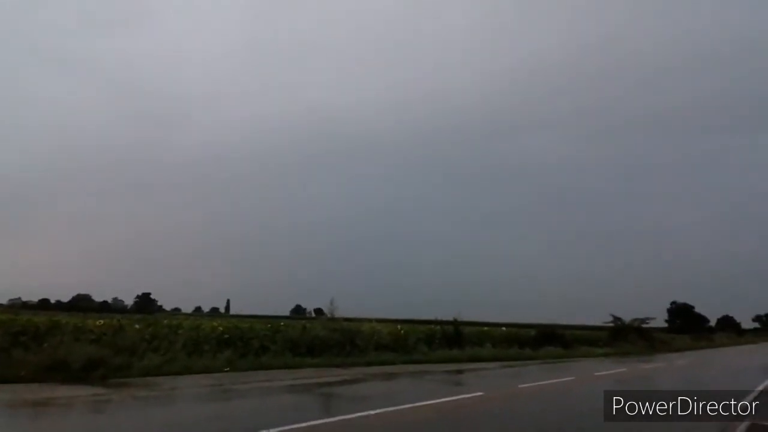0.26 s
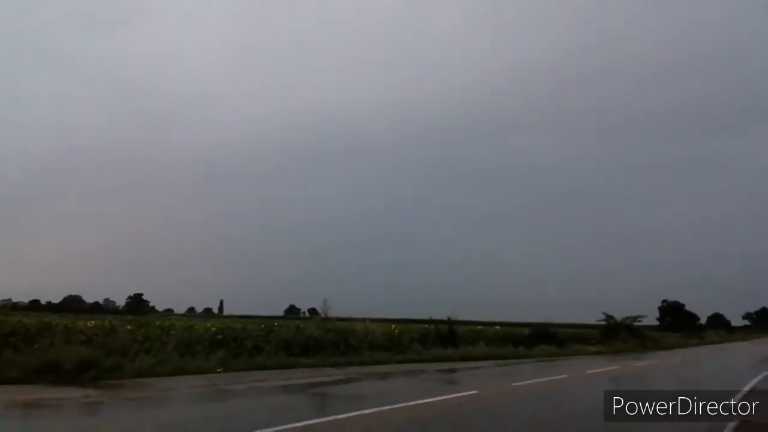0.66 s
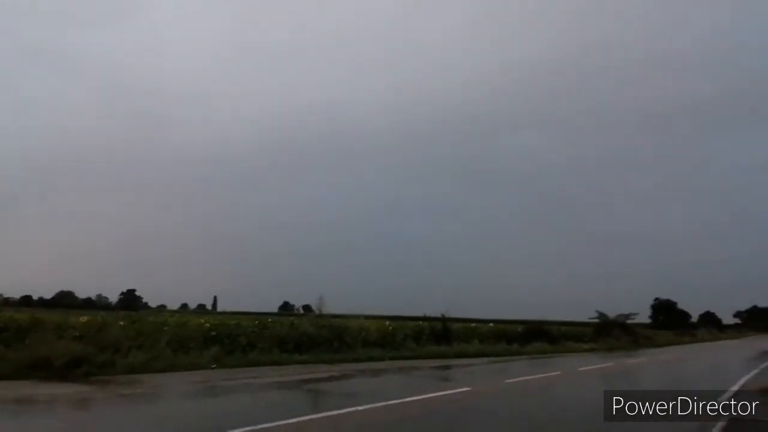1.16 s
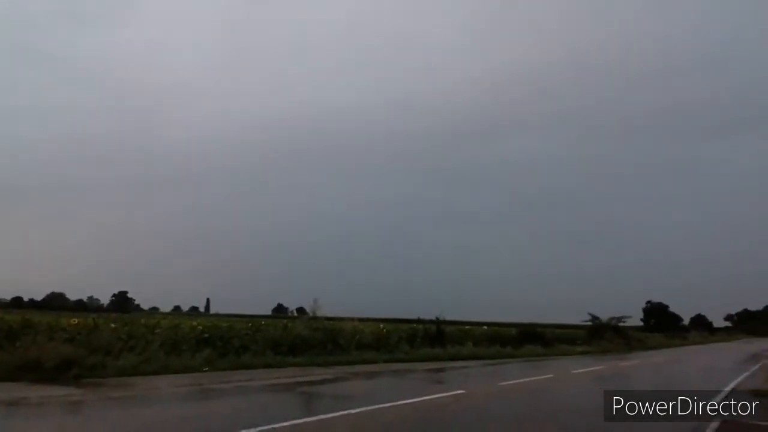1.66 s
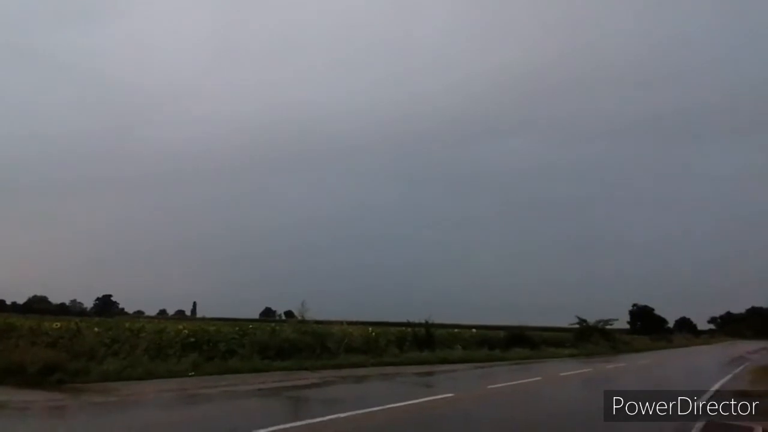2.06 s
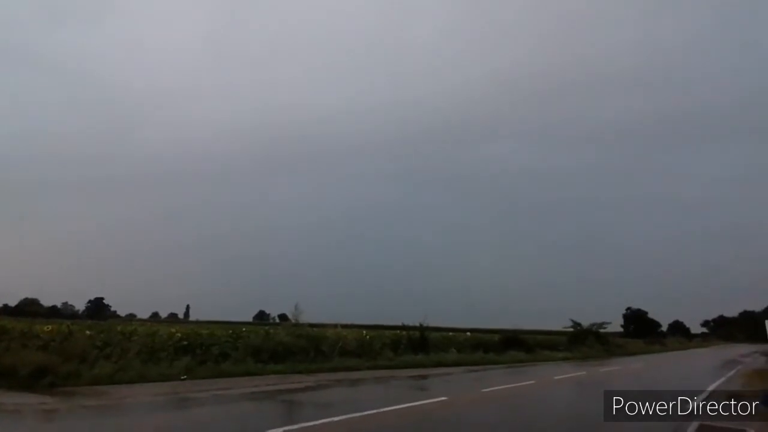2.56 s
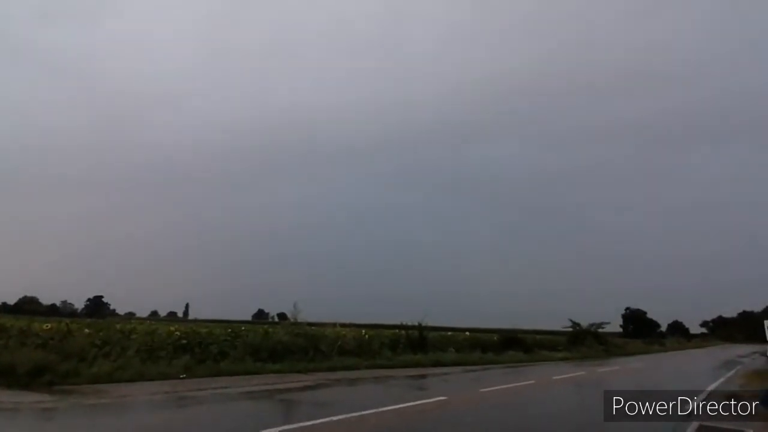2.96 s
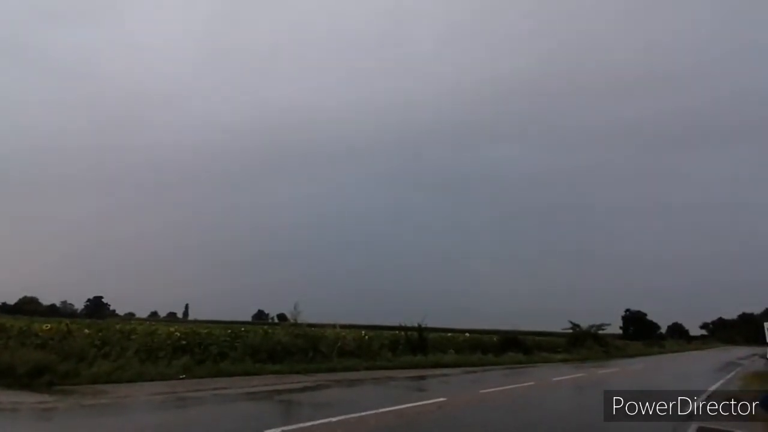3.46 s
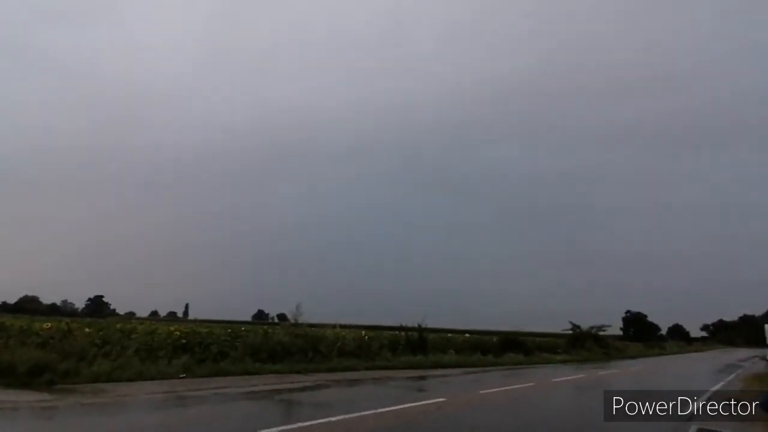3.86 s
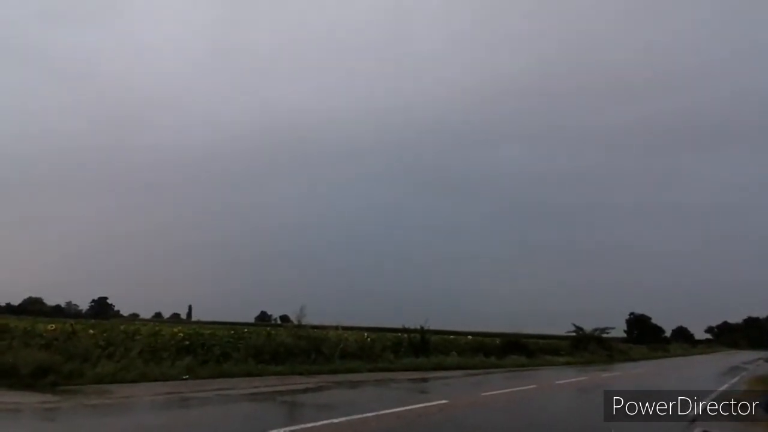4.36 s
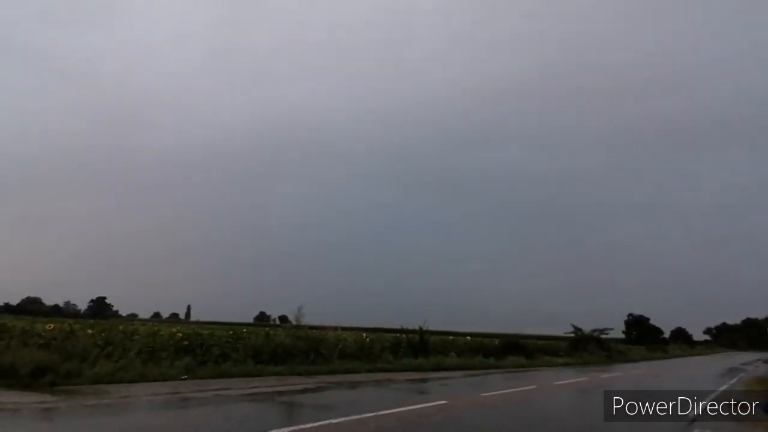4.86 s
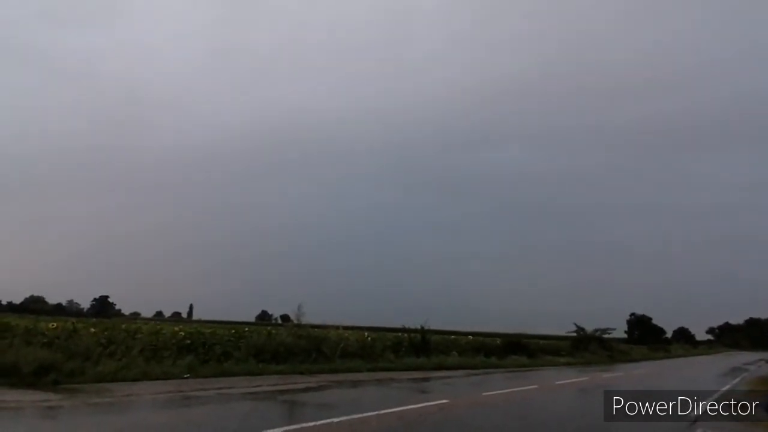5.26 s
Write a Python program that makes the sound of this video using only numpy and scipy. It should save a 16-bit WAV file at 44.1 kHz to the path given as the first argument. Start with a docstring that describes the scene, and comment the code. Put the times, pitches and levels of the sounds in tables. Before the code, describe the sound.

A low roll of thunder is sounding from the start, over open fields beside a wet road, with a small boom at 0.5 seconds. At about 1 second it swells suddenly into loud, deep booms and cracks, the sharpest near 1.2 seconds and another near 1.7. The loudest moments overload the small stereo microphone with a brief rasp. After a short dip, a second surge cracks at about 2.3 seconds and booms on until 3. The thunder then grows duller and weaker, with small swells near 3.3 and 3.8 seconds, drifting leftward. From about 4 seconds to the end at 5.5, faint hums and soft bumps sound on the left over the remaining rumble. Throughout, light rain makes a soft, fine hiss and patter, while single drops tick irregularly on a surface close to the microphone, mostly on the right.

```python
"""Thunder rolls over open fields beside a wet road, swells in several bursts and dies away.
Countless small shock waves from the long lightning channel blur into a rumble, and the strongest
stand out as booms and cracks. Light rain hisses on the road, and single drops tick on a surface
close to a small stereo microphone, mostly on its right. The loudest thunder overloads the
microphone, adding a brief rasp of distortion. Near the end come faint hums and bumps on the left."""
import sys
import numpy as np
from scipy import signal
from scipy.fft import rfft, irfft
from scipy.io import wavfile
from scipy.ndimage import uniform_filter1d

SR = 44100
rng = np.random.default_rng(int(sys.argv[2]) if len(sys.argv) > 2 else 0)


def wav_record(signal):
    """Record a signal, one row per channel, as 16-bit PCM in the file named by sys.argv[1]."""
    frames = np.transpose(np.atleast_2d(signal))
    bounded = np.clip(frames, -1, 1)
    # unit amplitude maps onto the largest positive 16-bit level
    quanta = np.round(bounded * 32767).astype(np.int16)
    wavfile.write(sys.argv[1], SR, quanta)


N = 242971

# The steady roll of thunder: (time [s], rumble [dB], rumble pitch [Hz], thuds [dB], roar [dB])
STEADY_ROLL = [(0, -35, 162.7, -36, -32), (.28, -33.5, 160, -30, -34), (0.499, -33, 153.2, -35, -39),
               (0.802, -36.5, 170, -54.5, -32.5), (.96, -34, 176.4, -44.5, -34.5),
               (1.358, -43, 150, -41, -36.5), (1.68, -37, 243.4, -34.5, -42), (1.9, -35, 143, -40.5, -45.5),
               (2.5, -33.5, 193.5, -40, -44), (3.13, -38, 186, -49, -49.5), (3.6, -43, 193, -48, -51),
               (4.05, -42.5, 227.6, -46, -49.5), (4.451, -39.5, 232, -52, -48),
               (4.899, -49.5, 157, -44, -55), (5.51, -48, 198.5, -55, -51)]
# Bursts, as a near bend of the lightning is heard:
# (time at full level [s], hold [s], rumble [dB], thuds [dB], roar [dB])
BURSTS = [(1.026, 0.1, -22, -25, -36), (1.205, 0.086, -21, -24, -32), (1.408, 0.056, -29, -27, -47.5),
          (1.624, 0.11, -25.5, -30.5, -34), (2.171, 0.018, -40, -29, -42.5),
          (2.275, 0.032, -21, -28.5, -31), (2.345, 0.03, -26, -25.5, -39.5), (2.579, 0.24, -32, -31.5, -46),
          (2.788, 0.24, -29.5, -36, -53), (3.247, 0.13, -29, -67, -46.5), (3.796, 0.046, -35.5, -46.5, -63)]
# Tone of the deep thuds: (frequency [Hz], level [dB])
THUD_TONE = [(12, -40), (28, -13.5), (45, 14), (75, 9), (120, 16.5), (180, -66.5)]
# Tone of the roar: (frequency [Hz], level [dB])
ROAR_TONE = [(200, -15), (330, -2.5), (600, -2.5), (1050, -12.5), (1500, -29), (2100, -42), (3000, -62)]
# Tone of the roar's bright top: (frequency [Hz], level [dB])
BRIGHT_TONE = [(700, -35), (1400, -14.5), (2100, -30.5), (3000, -48)]
# The low roll wanders from side to side: (time [s], left over right [dB])
ROLL_PAN = [(0, 3.5), (.8, 3.5), (1.1, -2.5), (1.7, 0.5), (3, 1), (4.4, 5.5), (5.2, 8), (5.51, 2.5)]
# The low sound reaches the right side first; near the end, the left: (time [s], left delay [samples])
LEFT_DELAY = [(4.3, 8), (4.7, -9)]
# Single booms, then faint hums and bumps on the left near the end:
# (time [s], level [dB], pitch [Hz], length [ms], left over right [dB])
BOOMS_AND_HUMS = [(.504, -19, 149, 7.3, -7), (.94, -29.5, 753, 6.8, -21.5), (1.034, -11, 117, 7.6, -2),
                  (1.049, -16, 132.5, 15, -3.5), (1.098, -8.5, 157, 14, -6), (1.16, -10, 161, 35, -6),
                  (1.244, -10.5, 340, 1.4, -10.5), (1.286, -12.5, 224, 7.1, -3),
                  (1.416, -18.5, 314, 4.6, -1), (1.425, -11.5, 98, 9.4, -2), (1.467, -19, 132, 10, -2),
                  (1.691, -13.5, 201, 3.2, -10.5), (2.2, -17.5, 270, 10, 2), (2.286, -15, 212, 14.5, -2.5),
                  (2.351, -32, 233, 9.3, 7.5), (2.585, -18, 109, 11, -3), (2.649, -10.5, 226, 7.6, -1),
                  (2.712, -19.5, 190, 21, -0.5), (3.002, -22.5, 70, 9.7, 20), (3.368, -26.5, 196, 7.6, -2),
                  (3.679, -29, 170, 20, 7.5), (3.836, -26.5, 284, 14, 3), (4.012, -27, 74, 23, 9),
                  (4.276, -29.5, 239.3, 63, 5.5), (4.5, -31, 175, 19, -3), (4.79, -34, 273, 18, 15.5),
                  (4.995, -32, 161.5, 12, 8), (5.015, -51.5, 648, 27, 18), (5.122, -55.5, 390, 200, 16),
                  (5.283, -32, 303, 18, 13), (5.362, -41, 445, 29, 5)]
# Sharp cracks within the bursts: (time [s], level [dB])
CRACK_HITS = [(1.032, -37.5), (1.242, -21.5), (1.285, -33.5), (1.414, -36), (1.627, -37), (1.689, -29.5),
              (2.27, -36.5), (2.289, -35), (2.354, -34.5)]
# Close raindrops: (time [s], level [dB], sharpness [0-1], left over right [dB])
CLOSE_DROPS = [(0.08, -42.5, 0, -11), (.2533, -56, 0.4, -5), (0.411, -46, 0.7, -4), (0.447, -40, 0.75, -5),
               (0.498, -35.5, 0.68, -8), (0.6749, -50, 1, 10), (0.833, -42, 0.3, -7),
               (0.9044, -45.5, 0.7, -7), (1.052, -41, 0.5, 5), (1.13, -44, 0.77, -8.5),
               (1.278, -49, 0.4, -11), (1.4843, -51.5, 1, -1), (1.6313, -51, 0.3, -14),
               (1.7556, -47.5, 0.05, -9), (1.8377, -48, .6, -3), (1.991, -44, 0.9, -4),
               (2.2644, -41.5, 0.95, -6), (2.4117, -45.5, 0.4, -4), (2.6217, -38, 0.2, -5.5),
               (2.649, -49.5, 0, -6), (3.558, -46, 0.7, -15), (3.9619, -55, 0.4, -2), (4.08, -43, 0.55, -1),
               (4.189, -51, 1, 4), (4.255, -42.5, 0.86, -3), (4.492, -41.5, 0.64, -3), (4.6513, -50, 1, 1),
               (4.701, -42.5, 0.4, -4), (5.125, -39.5, 1, -5), (5.2822, -46, 0.3, -9),
               (5.3213, -50, 0.6, 20), (5.3824, -45, 0.7, 8)]
# The patter comes in waves: (time [s], level [dB])
PATTER_LEVEL = [(0, -69), (0.999, -72), (3.001, -78.5), (5.51, -75.5)]
# Tone of the close drops and the patter: (frequency [Hz], level [dB])
DROP_TONE = [(1500, -3.5), (2800, -7), (5000, -11.5), (6500, -13), (10500, -19), (12500, -30),
             (16000, -50.5)]
# Tone of the far rain: (frequency [Hz], level [dB])
HISS_TONE = [(1000, -9.5), (1900, 1), (3400, -10), (5250, -12), (8400, -19.5), (10900, -19.5), (12500, -26),
             (15600, -39.5)]

RISE_DB_PER_S, FALL_DB_PER_S = 500, 158.5  # how fast a burst comes and goes
RING_HZ, RING_S, SPLASH_S = 5300, 0.00051, 0.0017  # a struck surface rings for only a few cycles
PATTER_PER_S, HISS_DB = 150, -66
TREBLE_LIMIT_HZ = 15700


def thunder_roll():
    """Shock waves from many bends of the lightning blur into thuds, a rumble and a brighter roar."""
    t = np.arange(N) / SR
    (rumble_gain, thud_gain, roar_gain), hz = thunder_swells(t)
    thuds = unit_level(shape_tone(clicks(per_s=500, spread_db=2.0, shared=0.83), THUD_TONE))
    rumble = resonate(clicks(per_s=1400, spread_db=2.0, shared=0.95), hz, width_hz=105)
    rumble = unit_level(resonate(rumble, hz, width_hz=150))
    shocks = clicks(per_s=5000, spread_db=1.5, shared=0.78) * waver(rate_hz=23.0, depth_db=1.03)
    shocks = mingling_echoes(shocks, depth_db=2.5)
    bright_gain = gain_of(-17 - 8.9 * t)  # later sound comes from further away, so air dulls it more
    roar = unit_level(shape_tone(shocks, ROAR_TONE))
    roar += bright_gain * unit_level(shape_tone(shocks, BRIGHT_TONE))
    low = rumble_gain * rumble + thud_gain * thuds
    return pan(follow(ROLL_PAN, t)) * low + roar_gain * roar


def thunder_swells(t):
    """Bursts rise, hold and fall over the steady roll; gives three gains and the rumble's pitch."""
    times, *columns = np.transpose(STEADY_ROLL)
    rumble_db, hz, thud_db, roar_db = (np.interp(t, times, column) for column in columns)
    power = gain_of([rumble_db, thud_db, roar_db]) ** 2
    for full_s, hold_s, *top_db in BURSTS:
        rise_db = -RISE_DB_PER_S * np.maximum(full_s - t, 0)
        fall_db = -FALL_DB_PER_S * np.maximum(t - full_s - hold_s, 0)
        power += np.outer(gain_of(top_db) ** 2, gain_of(rise_db + fall_db) ** 2)
    return np.sqrt(power), hz


def mingling_echoes(x, depth_db):
    """Each range of pitch swells and sinks on its own, as echoes from field and cloud overlap."""
    bands = signal.stft(x, nperseg=1024)[2]
    patches = uniform_filter1d(rng.standard_normal(bands.shape[1:]), size=3, axis=0)  # blur in pitch
    patches = uniform_filter1d(patches, size=4, axis=1)  # blur in time
    return signal.istft(bands * gain_of(depth_db * unit_level(patches)), nperseg=1024)[1][:, :N]


def booms_and_hums():
    """Each boom, hum or bump is a short tone that swells and fades."""
    out = np.zeros((2, N))
    t = np.arange(-6615, 6615) / SR
    for time_s, db, hz, length_ms, pan_db in BOOMS_AND_HUMS:
        phase = 2 * np.pi * hz * t
        wave = -np.cos(phase + 0.089 * np.cos(phase))  # the wave leans forward, adding overtones
        swell = np.exp(-np.log(16) * (1000 * t / length_ms) ** 2)
        add(out, time_s + t[0], gain_of(db) * pan(pan_db)[:, None] * wave * swell)
    return out


def thunder_cracks():
    """Each crack is one shock wave, a push then a pull, followed by quick echoes."""
    out = np.zeros((2, N))
    t = np.arange(900) / SR
    age = t / 0.00095
    air = signal.butter(4, 1900, fs=SR, output="sos")  # air softens the wave's front
    shock = signal.sosfilt(air, (1 - age) * np.exp(-age))
    for time_s, db in CRACK_HITS:
        echoes = rng.standard_normal((2, len(t))) * (rng.random((2, len(t))) < .04) * np.exp(-t / 0.009)
        echoes[:, 0] = 3  # the direct sound
        add(out, time_s, gain_of(db) * signal.fftconvolve(echoes, [shock / shock.max()], axes=1))
    return out


def raindrop(hz, ring_gain, sharpness):
    """A drop splashes and the surface rings briefly; sharp drops splash more and ring less."""
    t = np.arange(1500) / SR
    noise = rng.standard_normal((2, len(t)))
    spray = signal.lfilter([1, 0.8 - 1.7 * sharpness], 1, noise)
    splash = t / SPLASH_S * np.exp(1 - t / SPLASH_S) * spray
    ring = t / RING_S * np.exp(1 - t / RING_S) * np.sin(2 * np.pi * hz * t)
    # droplets fall back and keep the surface stirring
    droplets = 0.24 * np.exp(-t / 0.023) * resonate(noise, np.full_like(t, hz), width_hz=1600)
    return (1 - sharpness) * ring_gain * ring + (0.32 + sharpness) * splash + droplets


def rain():
    """Far drops blur into a fine hiss, nearer ones patter and the closest tick one by one."""
    far = clicks(per_s=18000, spread_db=1.3, shared=0.0081) * waver(rate_hz=15.0, depth_db=1.27)
    hiss = gain_of(HISS_DB) * unit_level(shape_tone(far, HISS_TONE))
    patter, close = np.zeros((2, 2, N))
    for hz in np.geomspace(3600, 8000, num=5):
        hits = clicks(PATTER_PER_S / 5, spread_db=2.5, shared=0.41)
        drop = raindrop(hz, ring_gain=0.65, sharpness=rng.random())
        patter += signal.oaconvolve(hits, drop, axes=1)[:, :N]
    for time_s, db, sharpness, pan_db in CLOSE_DROPS:
        hz = RING_HZ * (1 + 0.077 * rng.standard_normal())
        drop = raindrop(hz, ring_gain=2.5, sharpness=sharpness)
        add(close, time_s, gain_of(db) * pan(pan_db)[:, None] * drop)
    swell = gain_of(follow(PATTER_LEVEL, np.arange(N) / SR))
    return hiss + swell * unit_level(shape_tone(patter, DROP_TONE)) + shape_tone(close, DROP_TONE)


def clicks(per_s, spread_db, shared):
    """Random clicks of uneven size; both sides hear the shared part, the rest is scattered sound."""
    size = gain_of(spread_db * np.minimum(rng.exponential(1, (3, N)), 4)) * rng.standard_normal((3, N))
    hits = size * (rng.random((3, N)) < per_s / SR)
    return np.sqrt(shared) * hits[0] + np.sqrt(1 - shared) * hits[1:]


def waver(rate_hz, depth_db):
    """A gain that drifts up and down at random."""
    drift = signal.lfilter(*signal.butter(2, rate_hz, fs=SR), rng.standard_normal(N))
    return gain_of(depth_db * unit_level(drift))


def resonate(x, hz, width_hz):
    """Keeps a band around a moving pitch: shifts that pitch to zero, smooths, and shifts back."""
    spin = np.exp(2j * np.pi * np.cumsum(hz) / SR)
    decay = np.exp(-np.pi * width_hz / SR)
    return 2 * (spin * signal.lfilter([1 - decay], [1, -decay], x / spin)).real


def shape_tone(x, tone):
    """Turns each frequency up or down as a tone table says."""
    hz = np.fft.rfftfreq(N, 1 / SR)
    table_hz, db = np.transpose(tone)
    return irfft(rfft(x) * gain_of(np.interp(np.log(hz + 1), np.log(table_hz), db)), N)


def follow(table, t):
    """Reads a table at times t, along straight lines between its rows."""
    return np.interp(t, *np.transpose(table))


def gain_of(db):
    """Turns decibels into a number to multiply by."""
    return 10 ** (np.asarray(db) / 20)


def unit_level(x):
    """Scales a signal to an average power of 1."""
    return x / np.sqrt(np.mean(x ** 2) + 1e-20)


def pan(pan_db):
    """Left and right gains; above 0 dB the left is louder."""
    return gain_of(np.array([pan_db, -pan_db]) / 2)


def add(mix, time_s, sound):
    """Mixes a stereo sound in at the given time."""
    part = mix[:, max(round(time_s * SR), 0):][:, :sound.shape[1]]
    part += sound[:, :part.shape[1]]


def scene():
    """Thunder and late hums, dulled and reaching the two sides slightly apart, over the rain."""
    air = signal.butter(3, 2300, fs=SR, output="sos")
    left, right = signal.sosfilt(air, thunder_roll() + booms_and_hums()) + thunder_cracks()
    n = np.arange(N)
    left = np.interp(n - follow(LEFT_DELAY, n / SR), n, left)
    return np.array([left, right]) + rain()


def record(dry):
    """Loud thunder overloads the microphone with a rasp; gain control eases down; top treble is cut."""
    rasp_band = signal.butter(3, [1500, 2200], "bandpass", fs=SR, output="sos")
    rasp = signal.sosfilt(rasp_band, rng.standard_normal(dry.shape))
    distorted = dry + gain_of(-15.0) * rasp * uniform_filter1d(dry ** 2, 150)
    level_db = 10 * np.log10(abs(uniform_filter1d((dry ** 2).mean(0), 30000)) + 1e-12)
    eased = distorted / gain_of(0.18 * np.maximum(level_db + 34.5, 0))
    treble_cut = signal.firwin(1023, TREBLE_LIMIT_HZ, window=("kaiser", 9), fs=SR)
    padded = np.pad(eased, ((0, 0), (511, 511)), "reflect", reflect_type="odd")
    return signal.oaconvolve(padded, treble_cut[None], "valid")


dry = scene()
out = record(dry)
wav_record(out)
```